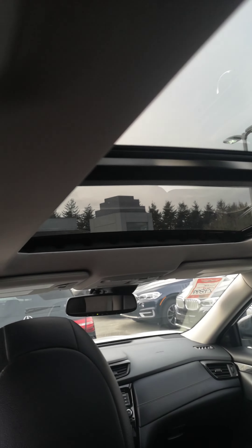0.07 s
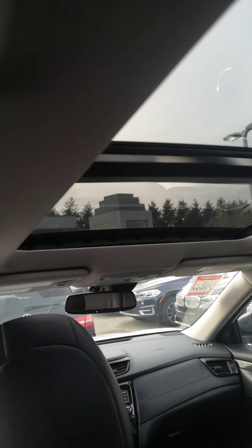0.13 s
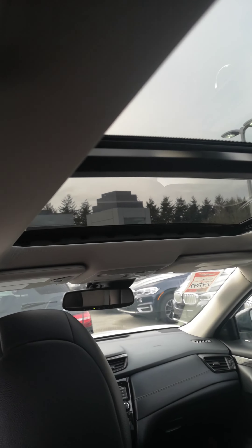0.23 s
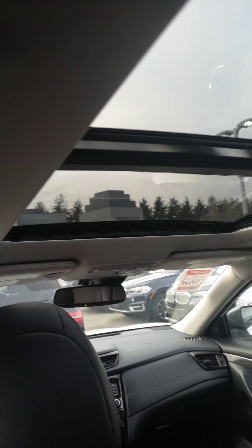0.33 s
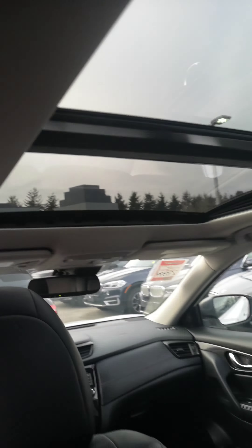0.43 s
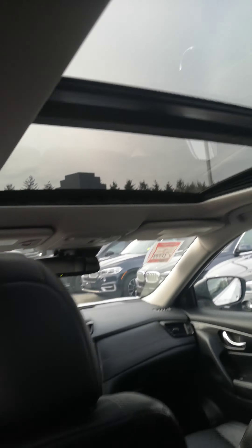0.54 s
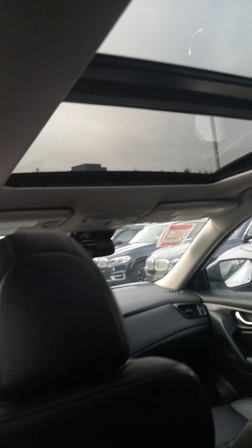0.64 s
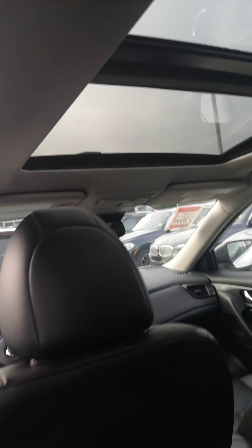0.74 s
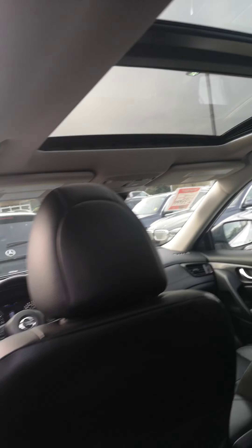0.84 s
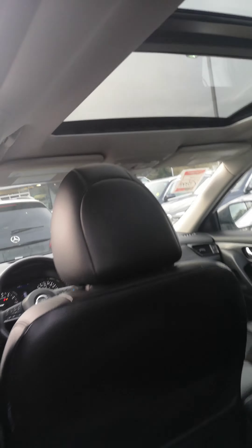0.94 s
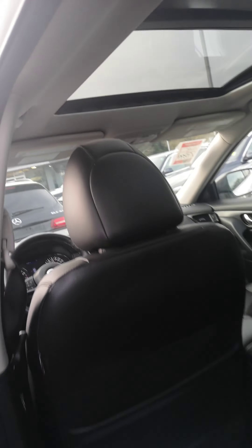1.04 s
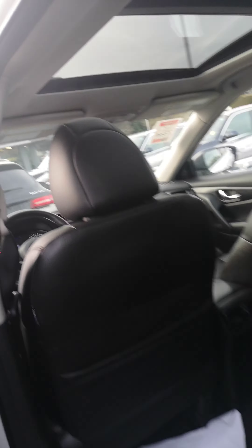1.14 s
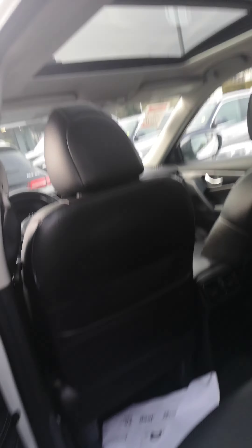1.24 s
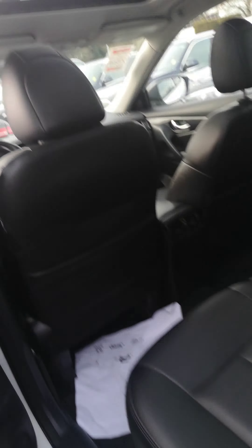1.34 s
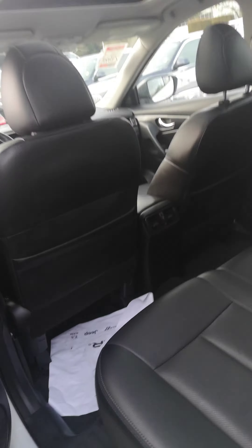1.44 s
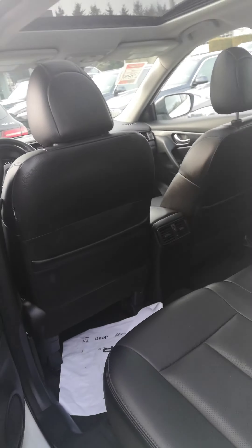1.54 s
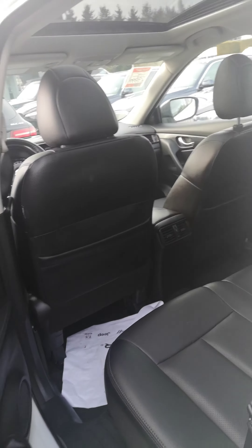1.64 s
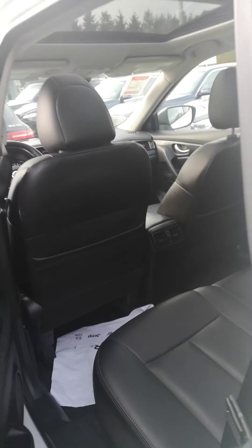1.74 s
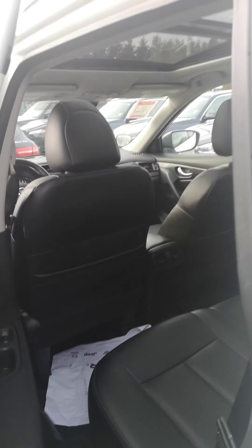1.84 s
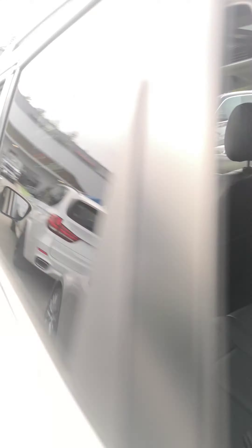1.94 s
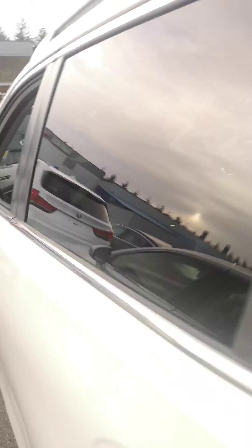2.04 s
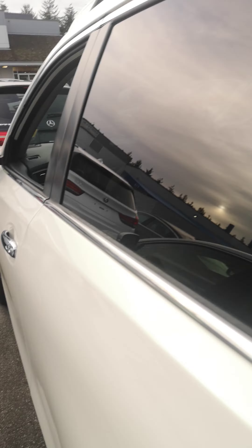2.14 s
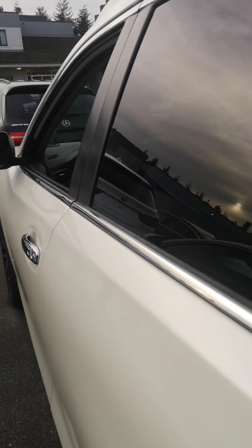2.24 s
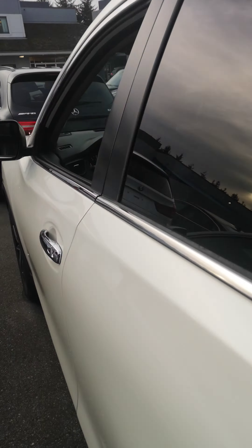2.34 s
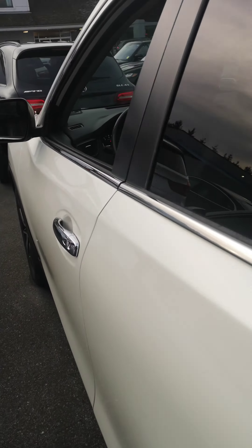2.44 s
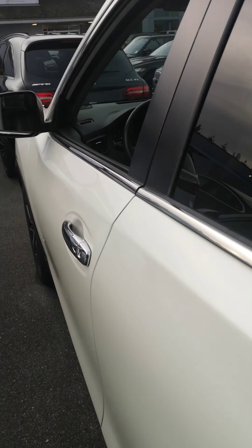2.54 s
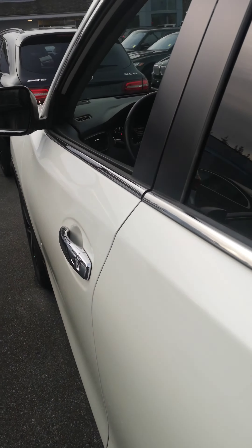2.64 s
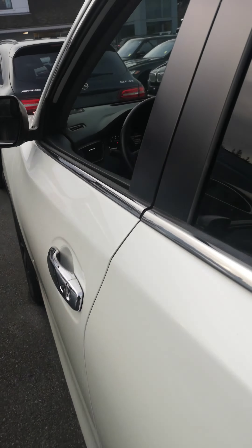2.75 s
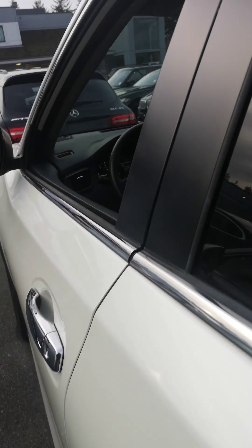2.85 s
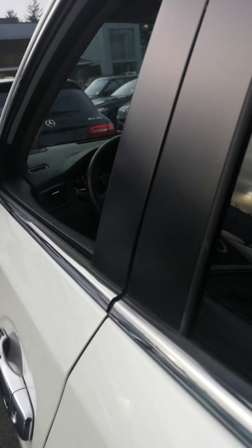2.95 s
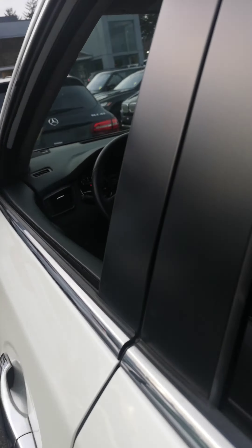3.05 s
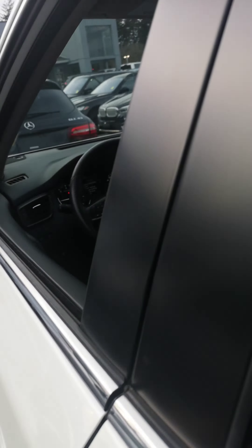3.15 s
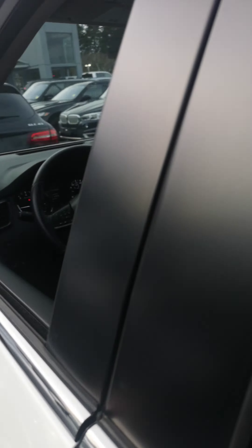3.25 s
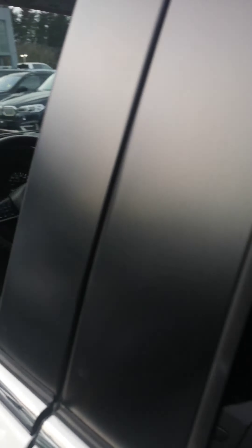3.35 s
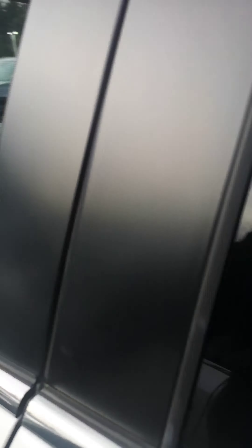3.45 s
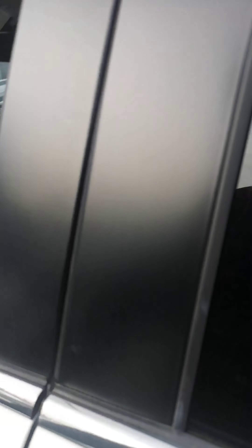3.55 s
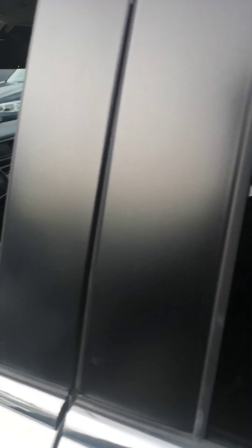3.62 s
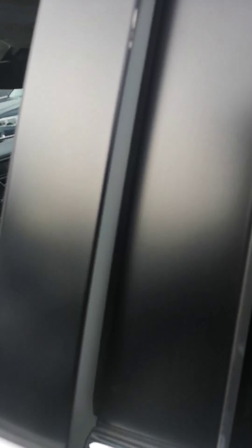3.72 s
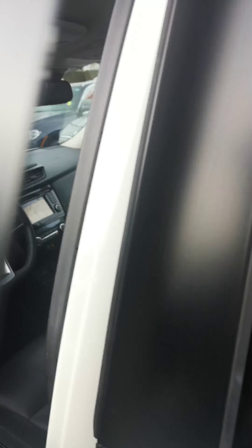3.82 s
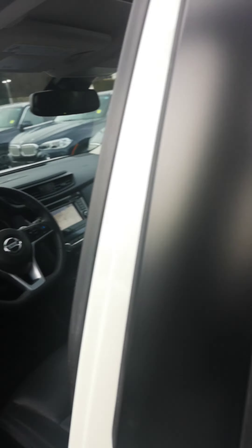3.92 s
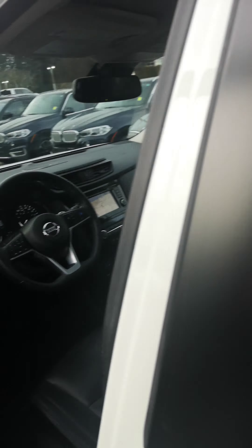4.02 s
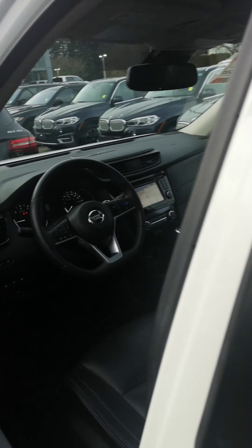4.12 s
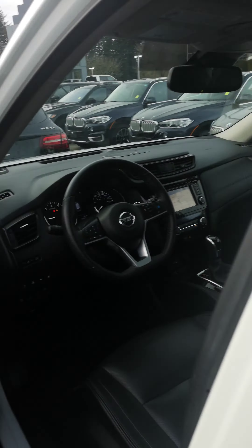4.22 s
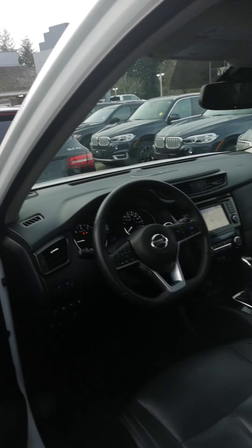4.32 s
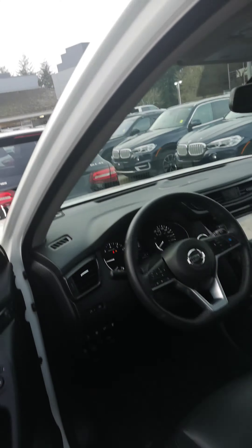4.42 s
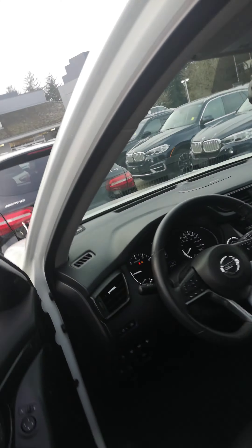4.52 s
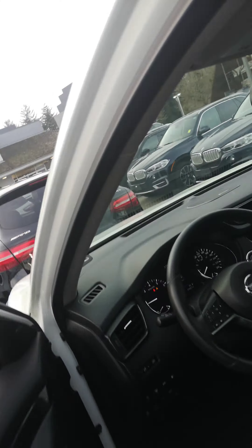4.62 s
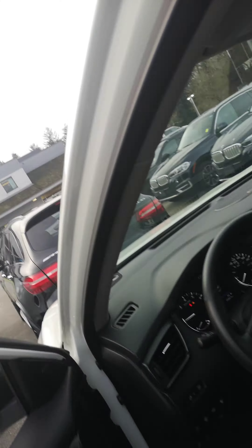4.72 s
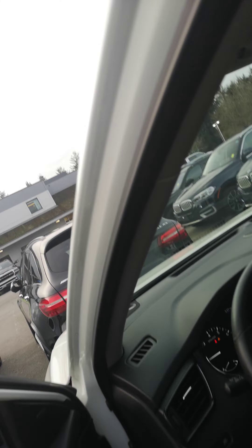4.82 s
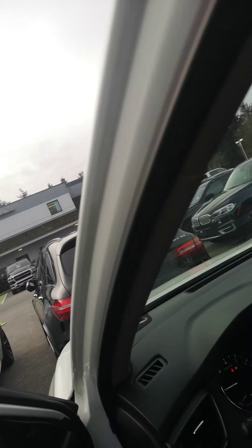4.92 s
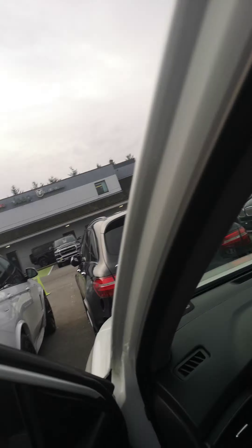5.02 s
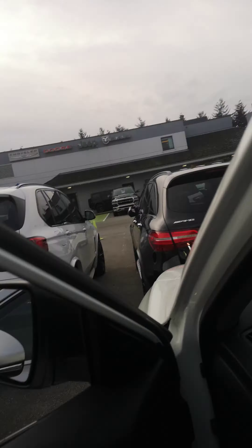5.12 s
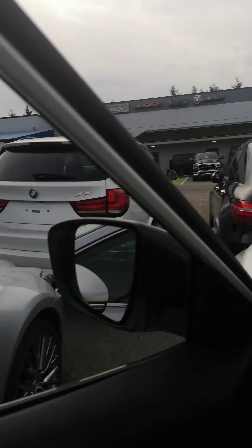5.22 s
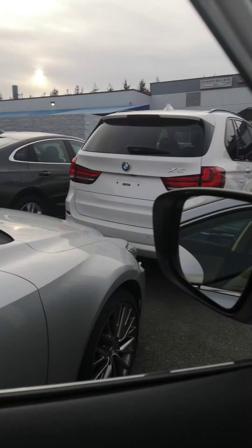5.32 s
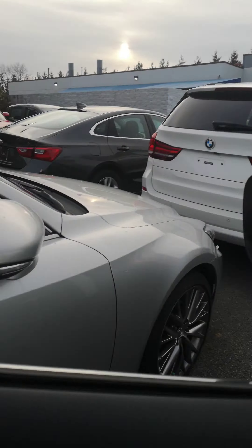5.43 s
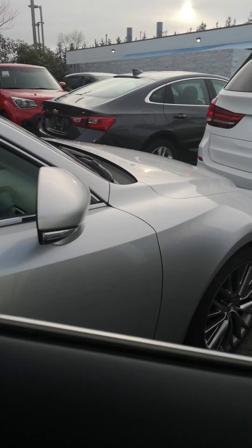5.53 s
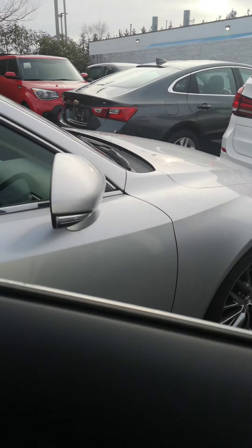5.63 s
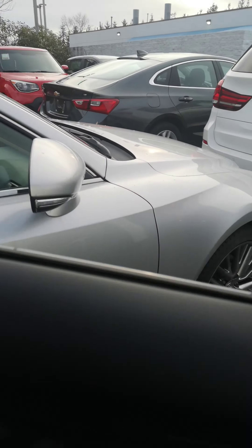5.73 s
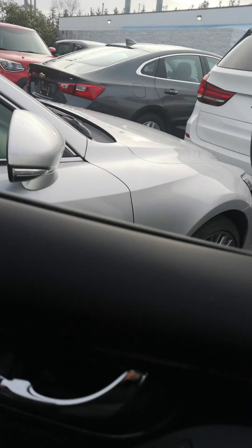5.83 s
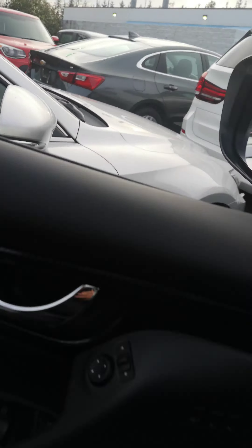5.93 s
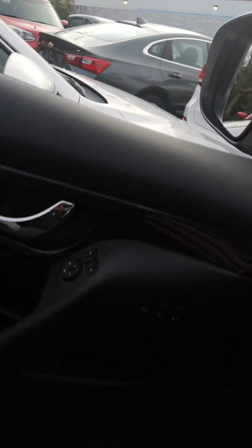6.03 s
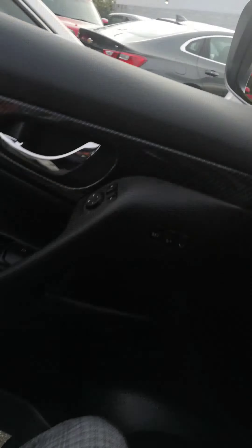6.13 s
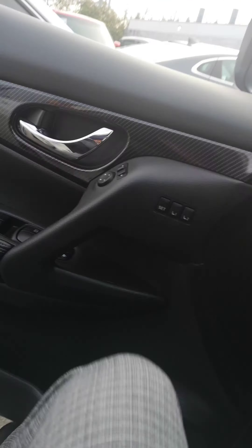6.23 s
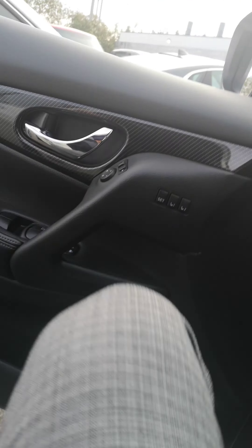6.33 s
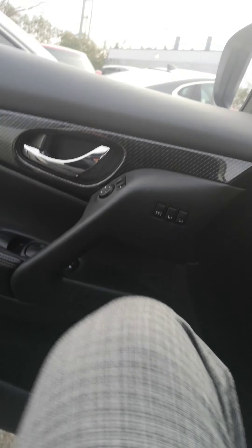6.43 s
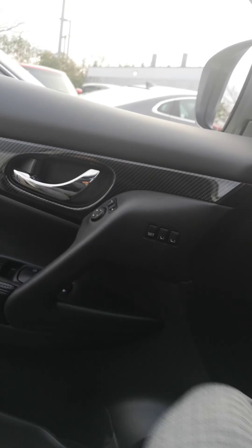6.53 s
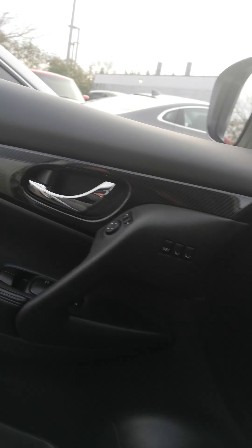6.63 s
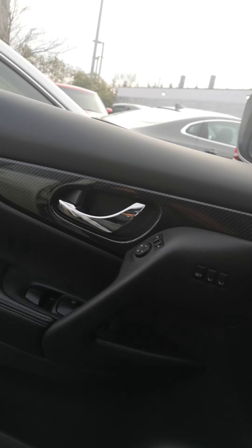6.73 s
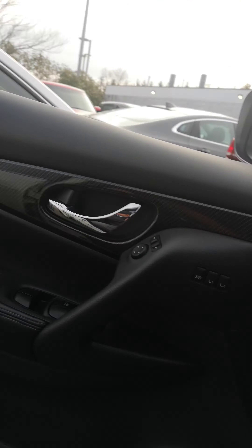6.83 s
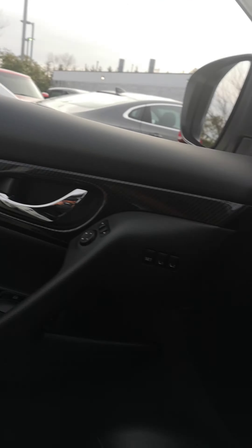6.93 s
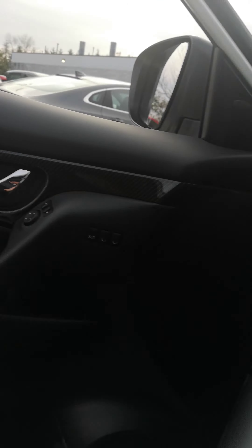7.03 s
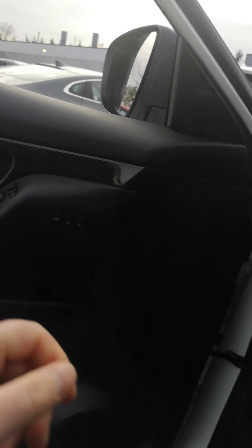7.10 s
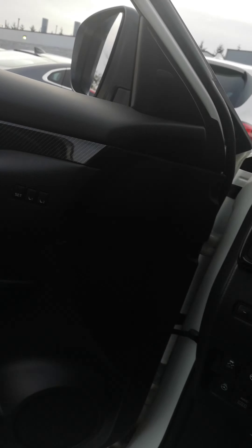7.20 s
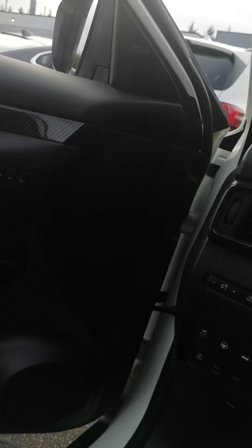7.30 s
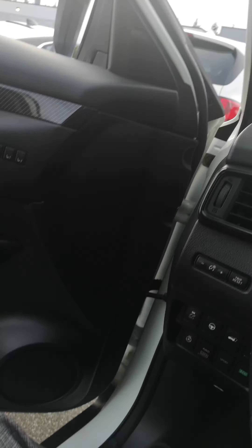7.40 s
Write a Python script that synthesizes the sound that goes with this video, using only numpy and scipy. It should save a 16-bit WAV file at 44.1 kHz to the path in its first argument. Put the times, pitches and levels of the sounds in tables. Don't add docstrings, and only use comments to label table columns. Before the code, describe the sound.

Quiet muffled cabin hum and idle, with faint cloth rustle, then one overwhelming car door slam, hard and bassy with loose parts rattling. The sound opens to brighter outdoor hiss and a fluttering fan whine. A second and a half later comes a sharp handle click and metallic latch release, a small door knock, scuffs, then a sill bump, squeaky leathery creak and dull seat thuds. Close phone microphone, dry, treble dulled.

```python
import sys
import numpy as np
from scipy import signal
from scipy.fft import rfft, irfft
from scipy.io import wavfile
from scipy.ndimage import uniform_filter1d

SR = 44100
rng = np.random.default_rng(int(sys.argv[2]) if len(sys.argv) > 2 else 0)


def to_linear_factor(level_db):
    exponent = np.asarray(level_db, float) / 20
    return 10 ** exponent


def store_wav(level_fs):
    pcm = np.round(np.clip(np.atleast_2d(level_fs), -1, 1) * 32767)
    wavfile.write(sys.argv[1], SR, pcm.T.astype(np.int16))


N = 329162

# pitch_hz, level_db_per_hz
AIR_SPECTRUM = [(12, -22), (30, -12.5), (60, -10.5), (113, -23), (200, -21), (330, -26.5), (630, -33),
                (850, -32), (1500, -39), (2400, -38), (3200, -42.5), (4300, -40), (5400, -41.5),
                (7100, -36.5)]
# time_s, level_db
OPENNESS = [(0, -6.5), (.85, -5.5), (1.1, -3), (1.35, -0.5), (1.75, -2), (2., 0.5), (2.3, 4.5), (2.85, 4.5),
            (3.3, 1.5), (3.75, 3), (4.1, -2), (4.4, 1), (4.8, -1), (5.5, -0.5), (6.55, -1), (6.9, 3),
            (7.2, 1.5), (7.46, -1.5)]
# pitch_hz, share_ratio
OPENNESS_SHARE = [(120, 0.16), (500, 0.27), (1700, 0.76), (4500, 1.)]
# pitch_hz, wander_rad, level_db_rms
HUMS = [(168.6, 1.1, -66), (235, 1.1, -67.5), (322.3, 1.1, -63), (504.35, 1.8, -67), (854, 2.64, -71.5),
        (757, 2.4, -74), (292, 1.5, -71), (357.03, 1.5, -70)]
# time_s, hum_236hz_db, hum_323hz_db, hum_505hz_db, hum_858hz_db
HUM_PLACES = [(0, -14, 1.5, -5, -11), (1.1, -6, 3, -15, -8), (1.5, 5, -2.5, 0.5, 4), (1.95, 2, -7, 0, -2.5),
              (2.5, -2, 0, -3, 5), (2.85, 0, -1, -3, 6), (3.3, 3, -10, 2.5, -6.5), (4.1, 4.5, 1.5, 1, 2),
              (4.6, 2, -3, -1, 7), (5, -7, -2.5, -7, -5.5), (5.55, 6, -3.5, 0, -6), (6.1, 0, 1, -6.5, 0.5),
              (7.46, -3, -1, -1, -8)]
# time_s, blade_hz, blade_db, sideband_db
FAN_WHINE = [(0, 800, -68.5, -72.5), (.93, 797, -78, -74.5), (1.43, 800, -71.5, -66.5),
             (2.3, 794.5, -71.5, -70), (2.55, 806.1, -65.5, -64.5), (2.7, 806, -66, -57.5),
             (2.85, 800, -54.5, -59.5), (3.05, 795, -60.5, -58.5), (3.3, 796.4, -61.5, -66),
             (3.6, 794.1, -60, -64), (3.9, 798, -62, -67), (4.3, 786.6, -61, -62.5), (4.6, 793.7, -69, -69),
             (4.85, 806, -61, -68), (5.15, 797.5, -61.5, -76), (5.55, 780.6, -65, -68),
             (5.82, 797, -61, -72), (6.08, 787.8, -54.5, -68.5), (6.18, 799.4, -59.5, -68),
             (6.29, 799, -54.5, -70), (6.42, 799.6, -64.5, -69), (7.46, 791.6, -67.5, -71)]
# time_s, firing_hz, order_5_db, order_4_lean_db (standing wave)
IDLE = [(0, 39.7, -52.5, -3.5), (.8, 39.6, -54, -7), (1.2, 38.9, -51, -2.5), (1.6, 38.8, -46, -3),
        (2, 38.63, -45.5, -5), (2.5, 38.75, -50, -3.5), (2.8, 39.26, -55.5, 5), (3.1, 39.2, -56, -1),
        (3.95, 39.12, -53, -1.5), (4.4, 38.68, -55.5, 5), (4.8, 39.55, -58, 0), (5.6, 38.79, -57, -6.5),
        (6.1, 39.08, -51.5, -5.5), (6.95, 38.49, -50, -3.5), (7.46, 38.15, -49.5, -11)]
# pitch_hz, width_hz, level_db_rms
DASH_HUMS = [(509.13, 16, -63), (1815, 40, -77.5)]
# start_s, length_s, level_db, pitch_hz, width_hz
RUBS = [(0.001, 0.033, -61.5, 1900, 150), (1.152, 0.352, -66.5, 4180, 705), (1.139, 0.7, -67.5, 1860, 701),
        (1.197, 0.31, -63.5, 6398, 900), (1.606, 0.032, -57.5, 6200, 2000),
        (4.256, 0.22, -64.5, 5501, 1501), (4.473, 0.18, -58, 2015, 351), (4.545, 0.084, -62, 1655, 200),
        (4.46, 0.13, -55.5, 796.9, 120), (4.591, 0.068, -54, 1017, 251), (4.618, 0.04816, -51.5, 494, 101),
        (5.741, 0.06, -62, 2098, 501), (6.022, 0.14, -61.5, 2780, 900), (6.783, 0.21, -63.5, 1590, 110),
        (6.806, 0.1, -63, 6031, 301), (6.822, 0.17, -67, 2250, 301), (7.318, 0.17, -56.5, 6500, 893),
        (7.319, 0.22, -60, 4200, 912), (7.333, 0.1, -62.5, 2577, 301)]
# start_s, level_db, pitch_hz, t60_s
BUMPS = [(1.471, -44, 794.2, 0.055), (2.44, -33, 50, .2), (2.165, -31, 1500, 0.12), (2.22, -47, 900, 0.21),
         (5.04, -51, 520, 0.086), (5.383, -44, 696, 0.081), (6.665, -55, 1050, 0.049),
         (7.293, -43, 451.7, .07)]
# start_s, level_db,
# pitch_hz, t60_s
TAPS = [(2.1647, -10, 95, 0.13), (2.19, -26, 52, .3), (2.206, -23, 283.2, .08), (2.222, -16, 57.52, .2),
        (2.268, -29, 45, .2), (2.294, -32.5, 120, .2), (2.338, -39, 194.5, .15), (2.355, -44, 270, .12),
        (2.375, -40, 120, .25), (2.42, -40, 135, .25), (2.345, -35, 38, .2), (4.39, -44, 245, .15),
        (6.93, -46, 370, .2), (2.292, -36, 270, .08), (2.295, -40.5, 450.1, 0.067),
        (2.295, -24.5, 69.59, 0.16), (2.33, -39, 200, 0.066), (3.7226, -36, 1830, 0.028),
        (3.7215, -28, 420, .04), (3.7305, -23.5, 569.8, .07), (3.731, -39, 1174, .064),
        (3.786, -42, 585.4, .07), (3.797, -43, 900, .06), (4.1287, -34, 1250, .025), (4.133, -40, 970, .05),
        (3.735, -43, 1866, 0.027), (3.768, -41.5, 847.2, 0.12), (4.131, -33.5, 1785, 0.04),
        (1.473, -44, 894.2, .025), (5.385, -48, 1400, .03), (6.654, -35.5, 376.3, 0.08),
        (6.665, -47, 1040, 0.09), (6.689, -42, 590, 0.074), (6.694, -33, 393, .05),
        (6.702, -39, 757.3, .04), (6.724, -44, 550, .04), (6.742, -46, 880, .07), (6.757, -35.5, 369, .05),
        (6.759, -45, 1005, .04), (6.781, -29, 258, .08), (6.783, -45, 925, .04), (6.807, -46, 800, 0.027),
        (6.808, -50.5, 1200, .03), (7.147, -49, 1146, 0.026), (7.144, -37.5, 340.5, 0.07),
        (7.1522, -30, 115.5, .07), (7.225, -44.5, 501.5, .08), (7.233, -29, 120, .06),
        (7.238, -50, 850, .04), (7.308, -30, 70, .1), (7.195, -40.5, 350, .06), (7.265, -46, 1453, .015),
        (7.296, -40, 450, 0.055)]

# first_ring_hz, second_ring_hz, t60_s, width_hz
HANDLE = (3820, 6750, 0.006, 400)
SPRING = (4458, 7100, 0.01957, 1000)
TRIM = (2060, 4400, 0.02968, 1830)
CLIP = (6354, 3400, 0.028, 2000)
PANEL = (1030, 2200, 0.014, 1200)
SEAT_FRAME = (3100, 4900, .014, 600)
SEAT_COVER = (2350, 4700, 0.008, 900)
# start_s, peak_db
HANDLE_TICKS = [(3.5477, -20), (3.549, -32)]
SPRING_TICKS = [(1.612, -50), (1.62, -46.5), (1.628, -47), (2.1254, -15), (2.99, -41), (3.614, -41),
                (3.62, -31.5), (3.633, -40), (3.64, -37), (3.664, -41), (3.672, -44), (3.8043, -46),
                (3.819, -42), (3.829, -36), (3.838, -32), (3.846, -36), (3.862, -44), (4.33, -45.5),
                (5.505, -46), (5.518, -43), (5.87, -50)]
TRIM_TICKS = [(2.1243, -13), (2.151, -16), (1.13, -44), (1.38, -47), (1.41, -46.5), (2.948, -40.5),
              (3.548, -28.5), (3.647, -35), (3.768, -31.5), (3.809, -42), (3.824, -38), (3.842, -38),
              (5.511, -40.5), (5.65, -45), (5.78, -46), (7.2298, -32)]
CLIP_TICKS = [(2.1213, -20), (2.1526, -10), (2.1552, -18), (3.751, -38), (3.756, -41), (3.5475, -25),
              (2.1801, -24.5), (2.2105, -37), (2.978, -36), (3.024, -34), (3.736, -27.5), (6.7038, -36),
              (6.7335, -38), (6.783, -35)]
PANEL_TICKS = [(1.473, -47), (4.1282, -26), (5.383, -48), (7.2646, -33.5), (7.299, -41)]
# start_s, peak_db
CREAK_SLIPS = [(6.0297, -35.5), (6.0472, -35), (6.0605, -36.5), (6.0763, -35), (6.0907, -39), (6.1027, -40),
               (6.121, -44), (6.1335, -44), (6.146, -50)]

# pitch_hz, level_db, t60_s
STRIKER = [(780.56, -9, 0.01522), (664.77, -2.5, 0.02981), (940, -8, 0.047)]
LATCH = [(150, 2.5, 0.11), (197.44, -5.5, 0.083), (237.05, -5, 0.12), (393, -7, 0.059), (521.36, -3, 0.07),
         (575.8, -7.5, 0.069), (798, -15, 0.088), (970, -21, 0.061), (1126.3, -15.5, 0.065),
         (1830, -19, .05)]
CHECK = [(176.01, -5.5, 0.15), (191, -5, 0.19), (300, -22, 0.047), (374.94, -6, 0.043), (501, -18, 0.043),
         (958.2, -12, 0.044), (1250, -11, 0.016), (1900, -12, 0.021)]
SILL = [(101.6, -3.5, 0.054), (136.77, 5, 0.078), (200, -13, 0.04), (322, -4, 0.05), (520, -5.5, 0.046),
        (970.75, -10, 0.041), (1406, -26, 0.03)]
SEAT = [(100, 2, 0.11), (126, 5.5, 0.07917), (210, -7, 0.0459), (300, -9, 0.05), (406.2, -5, 0.05),
        (610, -11.5, 0.046)]
# start_s, level_db
STRIKER_HITS = [(2.1105, -18), (2.1128, -14.5), (2.1153, -12), (2.1178, -10.5)]
LATCH_HITS = [(3.646, -41), (3.7217, -30.5), (3.7317, -23), (3.742, -26), (3.755, -32.5), (3.768, -36),
              (3.786, -41), (3.835, -47)]
CHECK_HITS = [(4.128, -34), (4.135, -43), (4.1397, -31.5), (4.149, -28.5)]
SILL_HITS = [(1.473, -51), (5.386, -47), (6.6355, -24), (6.783, -43), (7.146, -43), (7.298, -42)]
SEAT_HITS = [(6.708, -29), (6.7294, -26.5), (6.738, -34.5), (6.759, -31.5), (6.812, -38), (7.19, -39.5),
             (7.228, -38.5), (7.263, -37)]

# start_s, level_db, pitch_hz, t60_s
BOOMS = [(2.125, -20, 300, 0.29), (2.13, -9, 71.6, 0.23), (3.721, -29.5, 250, 0.16), (3.76, -44, 750, 0.3),
         (3.798, -32, 60, 0.15), (4.129, -39, 250, 0.2714), (4.401, -43, 398.8, 0.1),
         (6.66, -44, 795, 0.11), (6.69, -44.5, 550, 0.091), (6.701, -32, 108, 0.22),
         (6.749, -39, 300, 0.1228), (6.786, -47, 800, 0.174), (7.15, -50.5, 200, 0.14),
         (7.231, -41.5, 300, 0.2343)]
# pitch_hz, level_db_per_hz
RATTLE_SPECTRUM = [(180, -40.5), (300, -2), (374, 0.5), (733, -14), (888, -8), (1840, -23.5), (2700, -17),
                   (3190, -25), (6880, -21.5), (7370, -22), (8000, -25.5), (10400, -90), (17600, -120)]
# start_s, level_db, rise_s, t60_s
RATTLES = [(2.112, -16, 0.005, 0.06), (2.1192, -17, .0012, 0.03562), (2.123, -7.5, 0.0012, 0.02805),
           (2.1268, -7.5, .0008, 0.01727), (2.1325, -8, .0015, 0.049), (2.139, -13, 0.0012, 0.037),
           (2.145, -16.5, 0.0012, 0.04), (2.1504, -10, 0.0012, 0.034), (2.154, -18.5, .0015, 0.07),
           (2.1784, -20.5, 0.0012, 0.031), (2.186, -31.5, .002, 0.076), (2.2095, -32.5, 0.0012, 0.06289),
           (3.721, -32, 0.0014, 0.07805), (3.735, -37.5, 0.0011, 0.11), (3.752, -47, .003, 0.0821),
           (4.105, -40.5, 0.0018, 0.087), (4.1268, -28, 0.0011, 0.067), (4.136, -32.5, .001, .07),
           (6.635, -35.5, .0008, 0.05264), (6.78, -36.5, 0.0015, 0.04437)]
# pitch_hz, level_db, t60_s
DOOR_MODES = [(63.753, -4.5, 0.2), (83.3, -8, 0.18), (103, 0, 0.089), (133.8, -11, 0.19),
              (152.7, -9.5, 0.14), (176, -9.5, 0.13), (211.14, -16, 0.32), (250, -22, 0.27),
              (291, -22, 0.18), (339.4, -20, 0.15), (372, -17, 0.14), (437.08, -30.5, 0.12),
              (492.53, -20, 0.08126), (530, -30, 0.12), (670, -34, 0.19), (870, -17.5, 0.11),
              (969, -16.5, 0.063)]
# start_s, level_db, sharpness_hz
BLOWS = [(2.1232, -8, 1500), (2.1278, -1.5, 900), (2.1447, -6.5, 899.3), (2.152, -1.5, 1196),
         (2.1585, -12, 697.4), (2.21, -18.5, 500), (2.241, -23, 180)]
# start_s, level_db, sharpness_hz
REBOUNDS = [(2.1705, -7, 260), (2.181, -8.5, 240)]
# pitch_hz, level_db, t60_s
CABIN_MODES = [(29, 1.3, 0.26), (18.8, -8.5, 0.43), (37.96, -19, .5), (56.192, -19.5, .4)]


def unit_rms(x):
    return x / np.sqrt(np.mean(x ** 2) + 1e-20)


def wander(noise, size):
    return unit_rms(uniform_filter1d(uniform_filter1d(noise, size), size))


def read(points, hz):
    point_hz, value = np.transpose(points)
    return np.interp(np.log(hz + 1), np.log(point_hz + 1), value)


def columns(rows, t):
    time_s, *rest = np.transpose(rows)
    return [np.interp(t, time_s, column) for column in rest]


def add(mix, start_s, sound):
    part = mix[round(start_s * SR):][:len(sound)]
    part += sound[:len(part)]


def resonate(x, hz, width_hz):
    turn = np.exp(2j * np.pi * np.cumsum(hz * np.ones(len(x))) / SR)
    pole = np.exp(-np.pi * width_hz / SR)
    smooth = signal.lfilter([1 - pole], [1, -pole], x / turn)
    return 2 * (turn * smooth).real


def band_of(noise, hz, width_hz, second_width):
    return unit_rms(resonate(resonate(noise, hz, width_hz), hz, second_width * width_hz))


def ring(modes, rise_s=0.0006991):
    t = np.arange(SR // 3) / SR
    sines = sum(to_linear_factor(db - 60 * t / t60_s) * np.sin(2 * np.pi * hz * t) for hz, db, t60_s in modes)
    return sines * (1 - np.exp(-(t / rise_s) ** 2))


def burst(db, rise_s, t60_s):
    t = np.arange(SR // 4) / SR
    return to_linear_factor(db - 60 * t / t60_s) * (1 - np.exp(-t / rise_s))


def air():
    frames, hz = N // 256 + 5, np.fft.rfftfreq(1024, 1 / SR)
    a, b, patches_db = rng.standard_normal((frames, 513, 3)).T
    patches_db = unit_rms(uniform_filter1d(uniform_filter1d(patches_db, 12, 0), 14, 1))
    frame_s = np.arange(frames) * 256 / SR
    open_db = np.outer(read(OPENNESS_SHARE, hz), columns(OPENNESS, frame_s)[0])
    spectra = (a + 1j * b) * to_linear_factor(read(AIR_SPECTRUM, hz)[:, None] + open_db + patches_db)
    return to_linear_factor(-38.5) * signal.istft(spectra, nperseg=1024, noverlap=768)[1][:N]


def hums():
    noise, t = rng.standard_normal(N), np.arange(N) / SR
    slip, waver = wander(noise, 4000), wander(noise[::-1], 1200)
    place_db = columns(HUM_PLACES, t)
    cabin_db = -10 * np.clip((t - 1) / 0.3, 0, 1)
    swells_db = [0, *place_db, place_db[3], cabin_db, cabin_db]
    out = np.zeros(N)
    for k, ((hz, wander_rad, db), swell_db) in enumerate(zip(HUMS, swells_db), 1):
        level_db = db + swell_db + 1.8 * np.roll(waver, k * N // 9)
        phase = 2 * np.pi * hz * t + wander_rad * np.roll(slip, k * N // 11)
        out += to_linear_factor(level_db) * np.sqrt(2) * np.sin(phase)
    return out


def fan():
    noise, t = rng.standard_normal(N), np.arange(N) / SR
    blade_hz, blade_db, side_db = columns(FAN_WHINE, t)
    slip, flutter = wander(noise, 4000), wander(noise[::-1], 1200)
    flutter_db, sideband_hz, width_hz = 2.1, 824, 98
    blade_phase = 2 * np.pi * np.cumsum(blade_hz) / SR + 0.97 * slip
    side_phase = 2 * np.pi * sideband_hz * t + 1.2 * slip[::-1]
    blade = to_linear_factor(blade_db + flutter_db * flutter) * np.sqrt(2) * np.sin(blade_phase)
    side = to_linear_factor(side_db + flutter_db * flutter[::-1]) * np.sqrt(2) * np.sin(side_phase)
    fuzz_db = -64.5 + 0.42 * (blade_db - blade_db.mean())
    fuzz = unit_rms(resonate(resonate(noise[::-1], 799, width_hz), 780.65, 2 * width_hz))
    return blade + side + to_linear_factor(fuzz_db) * fuzz


def engine():
    t = np.arange(N) / SR
    firing_hz, five_db, lean_db = columns(IDLE, t)
    turns = np.cumsum(firing_hz) / SR
    one_db = -45.5 + 0.8909 * t
    four_db = five_db + lean_db
    levels_db = (one_db, one_db - 17, four_db - 6.5, four_db, five_db, five_db - 10)
    waver_db, drift_rad = -0.5, 0.7042
    out = np.zeros(N)
    for order, db in enumerate(levels_db, 1):
        waver = wander(rng.standard_normal(N), 3000)
        phase = 2 * np.pi * order * turns + drift_rad * waver[::-1]
        out += np.sqrt(2) * to_linear_factor(db + waver_db * waver) * np.sin(phase)
    return out


def dash():
    noise, start_s, rise_s = rng.standard_normal(N), 5.35, 0.082
    lean = np.clip((np.arange(N) / SR - start_s) / rise_s, 0, 1)
    return lean * sum(to_linear_factor(db) * band_of(noise, hz, width_hz, 2) for hz, width_hz, db in DASH_HUMS)


def rubs():
    out = np.zeros(N)
    for start_s, length_s, db, hz, width_hz in RUBS:
        noise, grain = rng.standard_normal((2, int(length_s * SR) + 1))
        grit = noise * to_linear_factor(2.6 * unit_rms(uniform_filter1d(grain, 120)))
        band = band_of(grit, hz, width_hz, 2)
        progress = np.minimum(np.arange(len(band)) / SR / length_s, 1)
        stroke = np.sin(np.pi * progress).clip(0) ** 0.4
        add(out, start_s, to_linear_factor(db) * band * stroke)
    return out


def taps():
    out = np.zeros(N)
    for start_s, db, hz, t60_s in TAPS:
        pair = [(hz, db, t60_s), (1.1 * hz, db - 13, 0.49 * t60_s)]
        add(out, start_s, ring(pair, 0.36 / hz))
    return out


def ticks():
    out = np.zeros(N)
    echo_s, echo_db = 0.0041, -11
    echoes = [(start_s + echo_s, db + echo_db) for start_s, db in CREAK_SLIPS]
    parts = ((HANDLE, HANDLE_TICKS), (SPRING, SPRING_TICKS), (TRIM, TRIM_TICKS), (CLIP, CLIP_TICKS),
             (PANEL, PANEL_TICKS), (SEAT_COVER, CREAK_SLIPS), (SEAT_FRAME, echoes))
    for (first_hz, second_hz, t60_s, width_hz), snaps in parts:
        for start_s, db in snaps:
            noise = rng.standard_normal(SR // 16)
            snap = burst(0, 0.00049, t60_s)[:len(noise)] * noise
            snap[20] += 3.5
            first = band_of(snap, first_hz, width_hz, 2)
            second = band_of(snap, second_hz, width_hz, 2)
            tick = first + 0.5892 * second + 0.25 * unit_rms(snap)
            add(out, start_s, to_linear_factor(db) * tick / abs(tick).max())
    return out


def knocks():
    out = np.zeros(N)
    bodies = ((STRIKER, STRIKER_HITS, 0.0004), (LATCH, LATCH_HITS, 0.0008), (CHECK, CHECK_HITS, 0.0008),
              (SILL, SILL_HITS, 0.0008), (SEAT, SEAT_HITS, 0.004))
    for body, hits, rise_s in bodies:
        for start_s, db in hits:
            spread = rng.standard_normal(len(body))
            modes = [(hz * (1 + 0.024 * v), db + mode_db + 2 * v, t60_s)
                     for (hz, mode_db, t60_s), v in zip(body, spread)]
            add(out, start_s, ring(modes, rise_s))
    return out


def booms(thuds):
    out = np.zeros(N)
    for start_s, db, hz, t60_s in thuds:
        band = band_of(rng.standard_normal(SR // 4), hz, 0.5192 * hz, 3)
        rise_s = 0.0035 + 0.68 / hz
        add(out, start_s, burst(db, rise_s, t60_s) * band)
    return out


def rattles():
    grain = unit_rms(uniform_filter1d(rng.standard_normal(N), 40))
    noise = rng.standard_normal(N) * to_linear_factor(1.6 * grain)
    color = to_linear_factor(read(RATTLE_SPECTRUM, np.fft.rfftfreq(N, 1 / SR)))
    noise = unit_rms(irfft(rfft(noise) * color, N))
    shake = np.zeros(N)
    for start_s, db, rise_s, t60_s in RATTLES:
        add(shake, start_s, burst(db, rise_s, t60_s))
    return noise * shake


def slam():
    out = np.zeros(N)
    for push, blows in ((0.87, BLOWS), (-0.3701, REBOUNDS)):
        for start_s, db, sharp_hz in blows:
            modes = [(hz, db + mode_db - 10 * np.log10(1 + (hz / sharp_hz) ** 4), t60_s)
                     for hz, mode_db, t60_s in DOOR_MODES]
            add(out, start_s, push * ring(modes))
    add(out, 2.1315, -ring(CABIN_MODES))
    return out


def scene():
    background = air() + hums() + fan() + engine() + dash()
    handling = rubs() + taps() + booms(BUMPS) + ticks() + knocks()
    door = booms(BOOMS) + rattles() + slam()
    return (background + handling + door)[None]


def roll_off(x):
    return signal.sosfilt(signal.butter(12, 8680, fs=SR, output="sos"), x)


def record(dry):
    overload, edge_hz = 1.07, 7518
    squeezed = overload * np.tanh(dry / overload)
    edge = signal.firwin(301, edge_hz, window=("kaiser", 8), fs=SR)
    mix = np.clip(signal.oaconvolve(squeezed, edge[None], "same"), -1, 1)
    return roll_off(mix)


dry = scene()
out = record(dry)
store_wav(out)
```